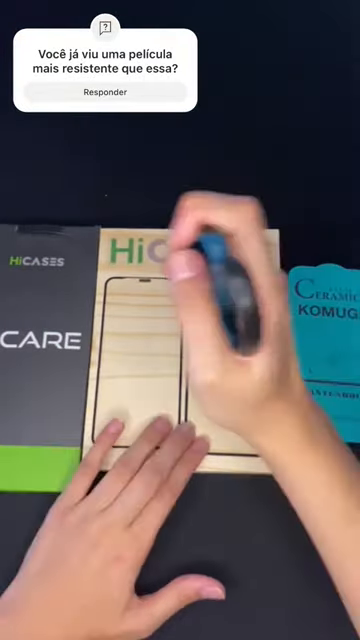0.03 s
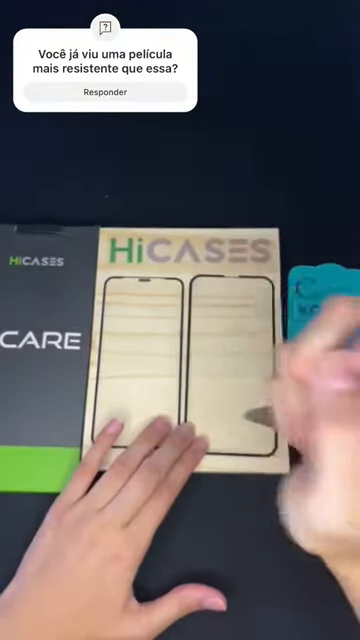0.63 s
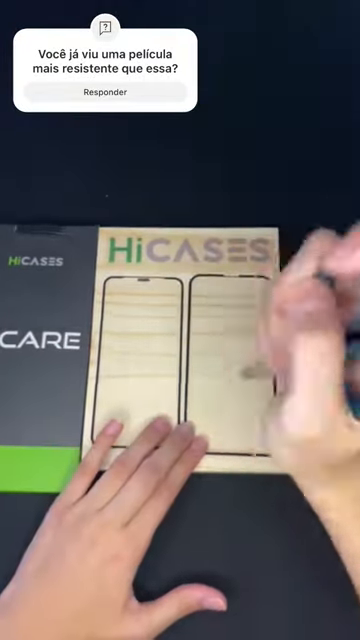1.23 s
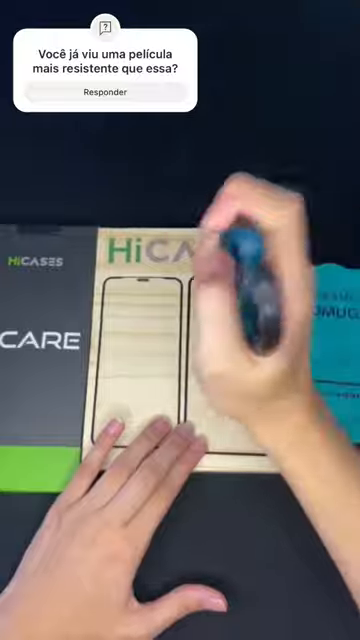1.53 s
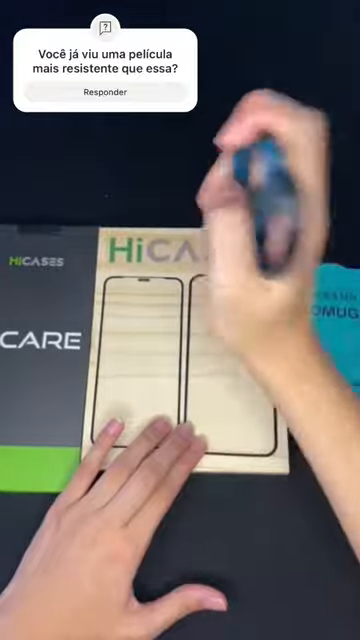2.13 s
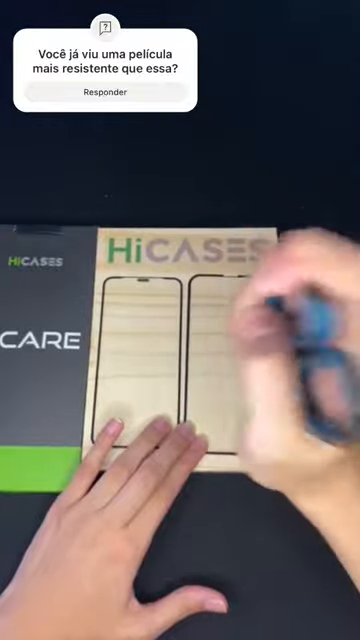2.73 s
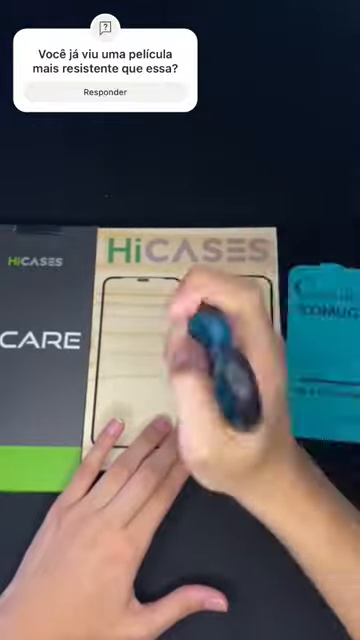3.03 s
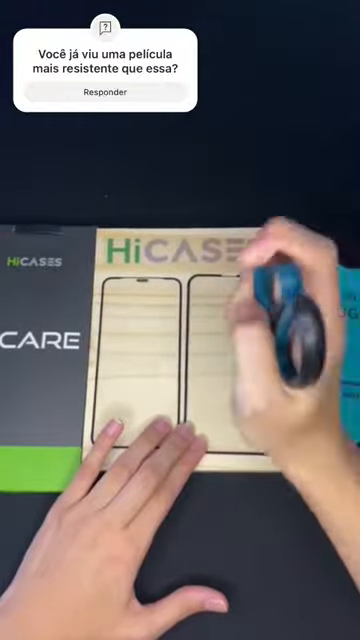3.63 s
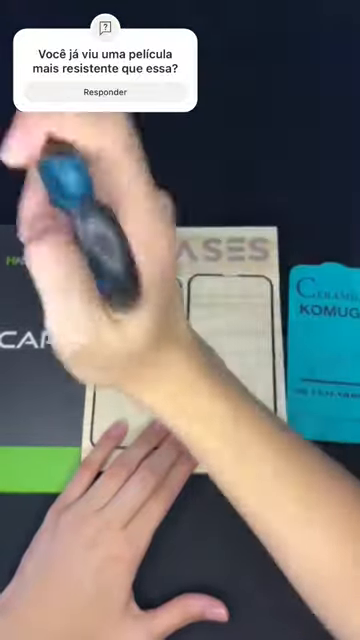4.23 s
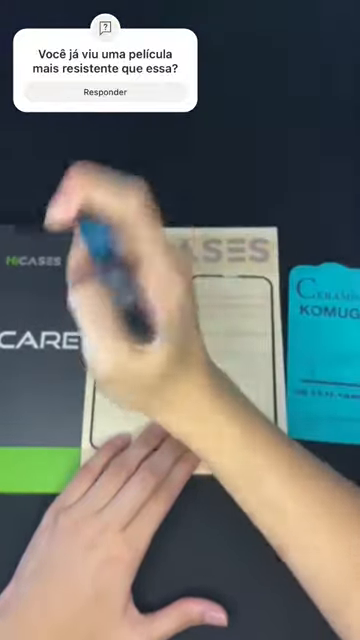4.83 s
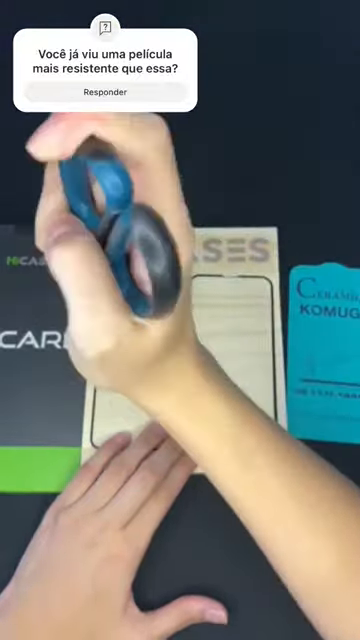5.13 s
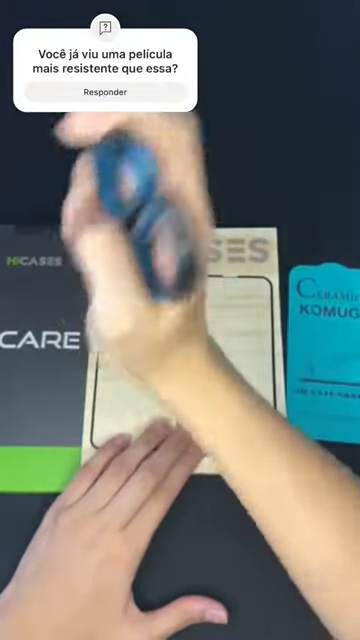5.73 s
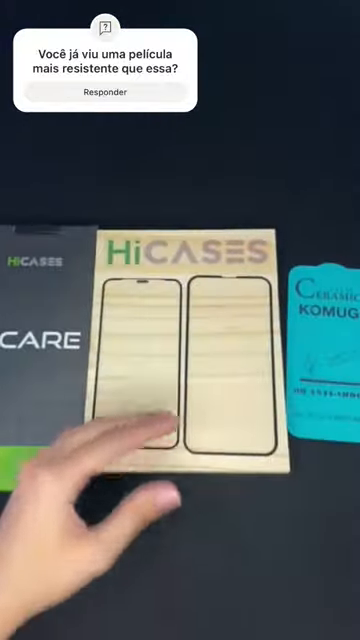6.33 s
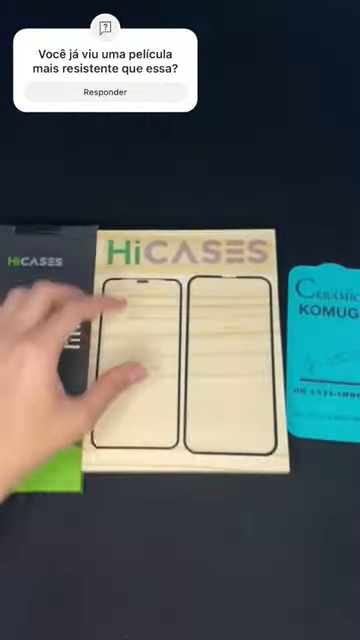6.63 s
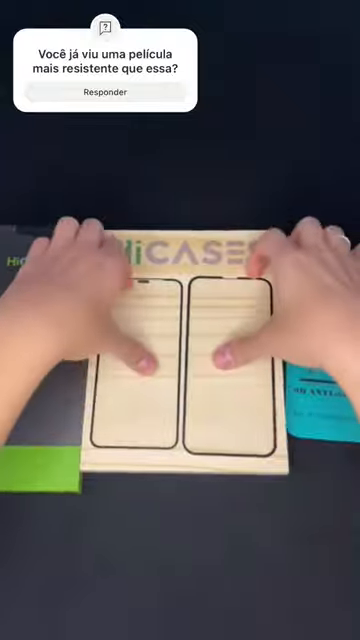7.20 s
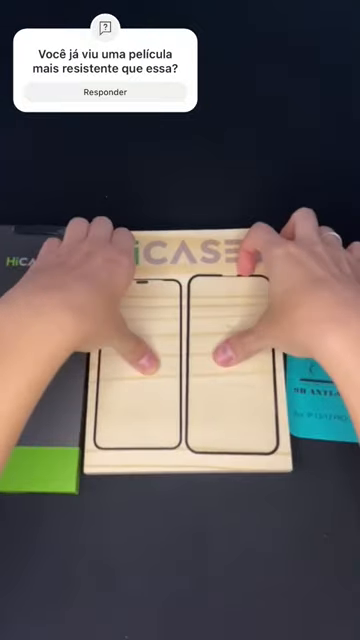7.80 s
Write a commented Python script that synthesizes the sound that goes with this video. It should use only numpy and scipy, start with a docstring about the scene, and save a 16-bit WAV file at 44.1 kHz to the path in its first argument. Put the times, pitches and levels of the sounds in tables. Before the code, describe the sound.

The point of a pair of scissors strikes protective film on a thin wooden board, about five times a second. Each hit gives a woody knock and a bright tick, with a low boom from the desk underneath. Halfway through, the firm taps become much louder, sharper stabs. The scissors are then put down with a double clack and fingers touch the board lightly. It sounds close, in a small, slightly echoing room.

```python
"""The point of a pair of scissors strikes two protective films on a thin wooden board on a desk.
Nineteen firm taps on one film precede nine hard stabs on the other, whose peaks saturate.
Each impact excites damped modes: the board knocks and clacks, the desk booms, and the film adds a tick.
A small room reverberates over a low rumble and a faint hiss. At the end the scissors are laid aside
with a double clack, and fingers take hold of the board."""
import sys
import numpy as np
from scipy import signal
from scipy.fft import rfft, irfft, next_fast_len
from scipy.io import wavfile

SR = 44100
rng = np.random.default_rng(int(sys.argv[2]) if len(sys.argv) > 2 else 0)


def wav_out(sig):
    """Save sig, one row per channel (or a flat mono array), as 16-bit PCM at SR to the path in sys.argv[1]."""
    wavfile.write(sys.argv[1], SR, np.round(np.clip(np.atleast_2d(sig).T, -1, 1) * 32767).astype(np.int16))


N = 351036
ATTACK_SAMPLES, HIT_SAMPLES = int(.03 * SR), int(.06 * SR)
HIT_TIME_S = np.arange(HIT_SAMPLES) / SR


def from_db(db):
    return 10 ** (np.asarray(db) / 20)


def unit_rms(x):
    return x / np.sqrt(np.mean(x ** 2) + 1e-20)


def unit_attack(x):
    """Scales a hit to rms 1 over its attack."""
    return x / np.sqrt(np.mean(x[:ATTACK_SAMPLES] ** 2) + 1e-20)


def decay(t, t60):
    return np.exp(-np.log(1000) * t / t60)


def at_hz(table, hz, column=1):
    """Interpolates one column along log frequency."""
    table = np.array(table)
    return np.interp(np.log(np.maximum(hz, 1)), np.log(table[:, 0]), table[:, column])


def at_time(curve, time_s):
    return np.interp(time_s, *np.transpose(curve))


def add(track, start_s, sound):
    start = max(round(start_s * SR), 0)
    track[..., start:start + sound.shape[-1]] += sound[..., :N - start]


def noise(spectrum, size):
    """Spectral shaping colours white noise; the result has rms 1."""
    gain = from_db(at_hz(spectrum, np.fft.rfftfreq(size, 1 / SR)))
    return unit_rms(irfft(rfft(rng.standard_normal(size)) * gain, size))


def pulse(low_hz, high_hz):
    """A band-limited impulse: the push of a contact within one band."""
    b, a = signal.butter(2, [low_hz, high_hz], "band", fs=SR)
    return unit_attack(signal.lfilter(b, a, signal.unit_impulse(HIT_SAMPLES) + 1e-18))


def resonator(drive, hz, t60):
    """A damped harmonic oscillator: a unit impulse starts a decaying sine of height 1."""
    radius, angle = decay(1 / SR, t60), 2 * np.pi * hz / SR
    return signal.lfilter([0, np.sin(angle)], [1, -2 * radius * np.cos(angle), radius ** 2], drive + 1e-18)


# Background spectrum: frequency_hz, relative_density_db
AIR_SPECTRUM = [(13, -33), (22, 5), (119, -7.5), (155, -8.5), (255, -13.5), (307, -18), (626, -25),
                (733, -26), (1490, -28.5), (1800, -28.5), (6050, -36.5), (7270, -35.5), (12000, -37.5),
                (15600, -68.5), (22000, -120)]
# Background level, higher while the board is handled: time_s, level_db
AIR_LEVELS = [(0, -55.5), (6.6, -55), (7.0, -54), (7.5, -55), (7.96, -57)]

def air():
    """Broadband noise, strongest at low frequencies, is heard as rumble with a faint hiss."""
    gain = from_db(at_time(AIR_LEVELS, np.arange(N) / SR))
    return gain * noise(AIR_SPECTRUM, next_fast_len(N))[:N]


def whine(pitch_hz=10050, t60_s=.02, level_db=-82):
    """A narrow resonance driven by noise gives a faint whistle."""
    return from_db(level_db) * unit_rms(resonator(rng.standard_normal(N), pitch_hz, t60_s))


# Reverberation of the small room: frequency_hz, gain_db, t60_s
ROOM_BANDS = [(100, -7, .6), (200, 3.5, 0.58), (404, -1.5, 0.5), (822.5, -3.5, 0.22), (1530, -5.5, 0.34),
              (2770, -10.5, 0.36), (5000, -12, 0.34), (10900, -17.5, 0.33)]

def room(sound, first_echo_s=0.005, wall_echo_s=0.028, late_share=.07, late_t60_s=1.19):
    """Reverberation: dense echoes decay band by band; near surfaces and a far wall stand out."""
    t, response = np.arange(SR) / SR, 0
    since = np.maximum(t - first_echo_s, 0)
    early = np.exp(-since / 0.003)
    wall = 0.69 * np.exp(-((t - wall_echo_s) / 0.0005) ** 2)
    envelope = (1 - np.exp(-since / 0.00093)) * (1 + early + wall)
    edges_hz = np.geomspace(110, 14000, 20)
    for low, high in zip(edges_hz, edges_hz[1:]):
        hz = np.sqrt(low * high)
        b, a = signal.butter(2, [low, high], "band", fs=SR)
        band = signal.lfilter(b, a, rng.standard_normal(SR + HIT_SAMPLES))[HIT_SAMPLES:]
        lingering = late_share * decay(t, late_t60_s / (1 + hz / 3500))
        tail = band * envelope * (decay(t, at_hz(ROOM_BANDS, hz, column=2)) + lingering)
        unit_gain = np.sqrt(2 * (high - low) / SR / np.sum(tail ** 2))
        response = response + from_db(at_hz(ROOM_BANDS, hz)) * unit_gain * tail
    return signal.fftconvolve(sound, response)[:N]


def reflection(sound, delay_s):
    """A reflected wave arrives late by the travel time of its extra path."""
    echo = np.zeros(N)
    add(echo, delay_s, sound)
    return echo


def near_echo(sound, delay_s=.0098, echo_db=-12, cutoff_hz=3000):
    """Early reflection: a surface close by returns one dull slap."""
    dull = signal.sosfilt(signal.butter(1, cutoff_hz, fs=SR, output="sos"), sound)
    return reflection(from_db(echo_db) * dull, delay_s)


# Low modes of desk and room, struck on the right or left: pitch_hz, right_db, left_db, t60_s
DESK_MODES = [(31.94, -11, -15, 1.5), (45, -19.5, -11, 0.67), (68.47, -5, -2.5, 0.88), (90, -10.5, 1, .7),
              (121.74, 1.5, -5, .9), (148.8, 4, 5, 0.19), (157, -5.5, -10, 0.045), (189, -4.5, -7.5, 0.62),
              (255.3, -5, -10.5, 0.61), (358.5, -12.5, -16.5, 0.78)]

def desk_boom(start_s, force_db, place, spread_db=1.52):
    """Impulse response: every contact sets the low modes of desk and room ringing."""
    boom, starts = np.zeros(N), (start_s * SR).astype(int)
    for k, (hz, right_db, left_db, t60) in enumerate(DESK_MODES):
        level_db = force_db + right_db + place * (left_db - right_db)
        impulses = np.zeros(N)
        impulses[starts] = from_db(level_db + rng.normal(0, spread_db, len(starts)))
        polarity = (-1) ** (k // 2)
        boom += polarity * resonator(impulses, hz, t60)
    return boom


# Spectrum of steel meeting film: frequency_hz, relative_density_db
TICK_SPECTRUM = [(2000, -15), (3500, -3.5), (4700, 1.5), (6000, -1.5), (7100, 1), (7900, -2.5), (9100, 3),
                 (10200, -5), (11400, -3.5), (13000, -18.5)]

def film_tick(place, rise_s=.0003):
    """A contact transient: a bright burst of noise that lasts longer on the left film."""
    t60_s = 0.0068 + 0.0074 * place
    envelope = decay(HIT_TIME_S, t60_s) * (1 - np.exp(-HIT_TIME_S / rise_s))
    return unit_attack(noise(TICK_SPECTRUM, HIT_SAMPLES) * envelope)


# Modes of the filmed board, struck on the right or left: pitch_hz, right_db, left_db, t60_s
BOARD_MODES = [(225, -3, -15, 0.017), (306.2, -4.5, -12, 0.053), (369.4, -1.5, -1, 0.052),
               (482, 0, -3.5, 0.038), (549, -3.5, 1, 0.043), (731, 5, 3, 0.024), (815.4, -5.5, -1.5, 0.03),
               (1026, -2, -3.5, 0.034), (1169, -8.5, 1.5, 0.027), (1300, -6, -2, 0.027),
               (1500, -10.5, -6.5, 0.018), (1738, 4.5, -0.5, 0.022), (2089, 1, 0, .013),
               (2407, 2.5, -0.5, 0.014), (2782, 1.5, -0.5, 0.015), (3277, -1.5, -3.5, 0.016),
               (3700, -9.5, 0, 0.012), (4250, -10, -12, 0.011), (4630, -11.5, -12, 0.017)]
CLACK_FROM_HZ = 1400

def board_ring(place, best_hz, high, spread_db, rise_cycles, scatter_rad, detune):
    """Modal superposition: the high or low modes swell and decay, weighted by the point of impact."""
    modes = [mode for mode in BOARD_MODES if (mode[0] >= CLACK_FROM_HZ) == high]
    hz, right_db, left_db, t60 = np.transpose(modes)
    strength, phase, load = rng.standard_normal((3, len(hz)))
    accent_db = 4.0 * np.exp(-(np.log2(hz / best_hz) / 0.29) ** 2)
    gain = from_db(right_db + place * (left_db - right_db) + accent_db + spread_db * strength)
    cycles = (hz * (1 + detune * load))[:, None] * HIT_TIME_S
    swell = 1 - np.exp(-cycles / rise_cycles)
    sines = np.sin(2 * np.pi * cycles + scatter_rad * phase[:, None])
    return unit_attack(gain @ (sines * swell * decay(HIT_TIME_S, t60[:, None])))


def strike(force_db, hardness_db, bite_db, place, best_hz):
    """An impact radiates a push, a low knock, a high clack and a tick. Rows: direct sound, room feed."""
    knock = board_ring(place, best_hz, high=False,
                       spread_db=1.5, rise_cycles=0.56, scatter_rad=1.464, detune=.012)
    clack = board_ring(place, best_hz, high=True,
                       spread_db=0, rise_cycles=0.22, scatter_rad=1.8, detune=.033)
    knock_gain, clack_gain, tick_gain = from_db([force_db, force_db + hardness_db, force_db + bite_db])
    ringing = knock_gain * knock + clack_gain * clack
    tick = tick_gain * film_tick(place)
    # the harder stabs on the left are shorter contacts, so their push holds less bass
    push = knock_gain * pulse(300 * (1 + 0.25 * place), 1174) - clack_gain * pulse(1455, 3200)
    bright = tick_gain * pulse(3700, 11500)
    spot_gain = knock_gain if best_hz < CLACK_FROM_HZ else clack_gain
    spot = spot_gain * pulse(best_hz / 1.15, best_hz * 1.15)
    direct = ringing + tick + 0.2 * (push + bright)
    radiated = 0.46 * ringing + 0.65 * push + 0.1 * spot + 0.98 * bright + 0.47 * tick
    return np.array([direct, radiated])


# Light contacts of scissors and fingers: start_s, force_db, hardness_db, bite_db
# (hardness is clack over knock, bite is tick over knock)
LIGHT_CONTACTS = [(6.507, -64, -27, -30), (6.663, -43, -1, -17), (6.679, -40.5, 4.5, -8),
                  (6.774, -63, 0, -4), (7.077, -65, 0, -9), (7.272, -83, 0, 13), (7.363, -68.5, 1, -1),
                  (7.475, -72.5, 3, 3), (7.851, -66.5, -0.5, 3)]

def handling(boom_db=-8.0, bloom_db=-7.0, room_db=6.5, snap_db=0.5):
    """Weak impacts of scissors laid aside and of fingertips; the desk responds in proportion to force."""
    board, bloom = np.zeros((2, N)), pulse(200, 285)
    for start_s, force_db, hardness_db, bite_db in LIGHT_CONTACTS:
        add(board, start_s, strike(force_db, hardness_db, bite_db, place=0.48, best_hz=1000))
        add(board[1], start_s, from_db(force_db + bloom_db) * bloom)
    start_s, force_db, _, bite_db = np.transpose(LIGHT_CONTACTS)
    landing = np.argmax(force_db + bite_db)   # the steel lands and the loose blades snap together
    add(board, start_s[landing], from_db(force_db[landing] + snap_db) * pulse(2500, 5000))
    boom = desk_boom(start_s, force_db + boom_db, place=0.34)
    return np.vstack([board[0], from_db(room_db) * board[1], boom])


# Point of impact: time_s, place (0 = right film, 1 = left film)
IMPACT_PLACE = [(0.29, 0.097), (3.86, .12), (4.17, .78), (5.83, .93)]
# Weight of the fist behind the blows: time_s, weight_db
FIST_WEIGHT = [(0.29, -25), (0.91, -24.5), (1.12, -27), (1.91, -22.5), (2.1, -23), (2.3, -26), (3.05, -27),
               (3.46, -24.5), (3.86, -28.5), (4.18, -24), (4.4, -27.5), (5.61, -28), (5.83, -25)]
# Sharpness of the point on the film as the grip shifts: time_s, bite_db
POINT_BITE = [(0.29, -13), (0.7, -17), (2.86, -16.5), (3.24, -10), (3.46, -9), (3.65, -16.5), (3.86, -10.5),
              (5.83, -12.5)]
# Taps and stabs: start_s, force_db, hardness_db, best_hz (the frequency best excited at that spot)
SCISSOR_BLOWS = [(0.2903, -18, -9.5, 480), (0.51, -16.5, -5.5, 1010), (0.7081, -16, -1.5, 1740),
                 (0.9128, -18, -9.5, 480), (1.1185, -16, -7, 740), (1.3037, -17.5, -6.5, 400),
                 (1.513, -17.5, -4.5, 740), (1.717, -20, -9.5, 360), (1.9063, -16.5, -9.5, 360),
                 (2.0971, -15, -10.5, 420), (2.2955, -18, -6.5, 360), (2.482, -17.5, -13.5, 740),
                 (2.6694, -18, -13.5, 420), (2.8626, -17.5, -11, 480), (3.053, -17.5, -8.5, 770),
                 (3.2443, -15, -10, 740), (3.4585, -17, -9, 740), (3.6493, -18.5, -18, 480),
                 (3.8568, -21, -9, 360), (4.1763, -9.3, 1, 1230), (4.396, -9.7, 1.5, 1780),
                 (4.6114, -10, -0.5, 740), (4.8168, -9, -1.5, 1740), (5.0256, -10, 2, 2370),
                 (5.2248, -10, 2.5, 2570), (5.4176, -11, -5, 1020), (5.6145, -10, 1.5, 740),
                 (5.8294, -10, 0.5, 1130)]

def scissor_blows(bloom_db=-1.5, thump_db=-1.0):
    """Impact excitation: the point rings the board, and the fist's weight drives the desk and room."""
    board, bloom = np.zeros((2, N)), pulse(133, 224)
    desk_top, thump = np.zeros(N), pulse(106, 282)
    for start_s, force_db, hardness_db, best_hz in SCISSOR_BLOWS:
        weight_db, bite_db = at_time(FIST_WEIGHT, start_s), at_time(POINT_BITE, start_s)
        place = at_time(IMPACT_PLACE, start_s)
        add(board, start_s, strike(force_db, hardness_db, bite_db, place, best_hz))
        add(board[1], start_s, from_db(weight_db + bloom_db) * bloom)
        add(desk_top, start_s, from_db(weight_db + thump_db) * thump)
    start_s = np.transpose(SCISSOR_BLOWS)[0]
    boom = desk_boom(start_s, at_time(FIST_WEIGHT, start_s), at_time(IMPACT_PLACE, start_s))
    far_wall = reflection(desk_top, delay_s=0.041)
    return np.vstack([board, boom + desk_top + far_wall])


def scene():
    """Superposition: direct sound, reflections, desk and background add at the microphone."""
    direct, radiated, desk = scissor_blows() + handling()
    t = np.arange(N) / SR
    # each blow gets its own random blend of three echo patterns, so its reverberation varies slightly
    blow_number = np.searchsorted(np.transpose(SCISSOR_BLOWS)[0], t + .01)
    shares = rng.standard_normal((len(SCISSOR_BLOWS) + 1, 3))
    shares /= np.linalg.norm(shares, axis=1, keepdims=True)
    echoes = sum(room(radiated * share[blow_number]) for share in shares.T)
    slap = near_echo(direct * (.3 + 0.29 * at_time(IMPACT_PLACE, t)))   # stronger from the left film
    return (direct + slap + echoes + desk + air() + whine())[None]


def record(dry, ceiling=0.92, band_top_hz=11800, cutoff_hz=15000):
    """Saturation rounds the hardest peaks, the treble is cut above about 12 kHz, and overshoot clips."""
    rounded = dry / (1 + np.square(dry / ceiling) ** 2) ** (1 / 4)
    narrow = signal.sosfilt(signal.ellip(8, .3, 70, band_top_hz, fs=SR, output="sos"), rounded)
    clipped = np.clip(narrow, -.95, .95)
    return signal.sosfilt(signal.ellip(8, .1, 80, cutoff_hz, fs=SR, output="sos"), clipped)


dry = scene()
out = record(dry)
wav_out(out)
```